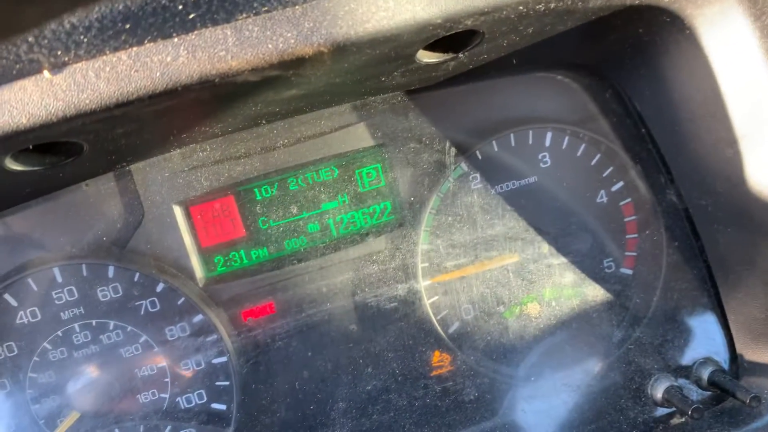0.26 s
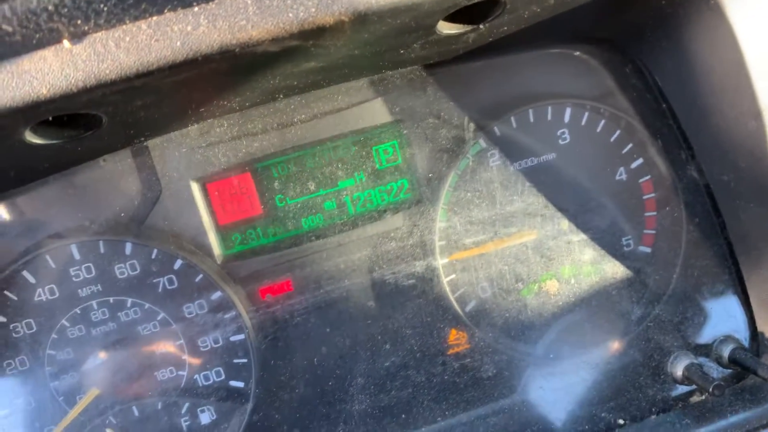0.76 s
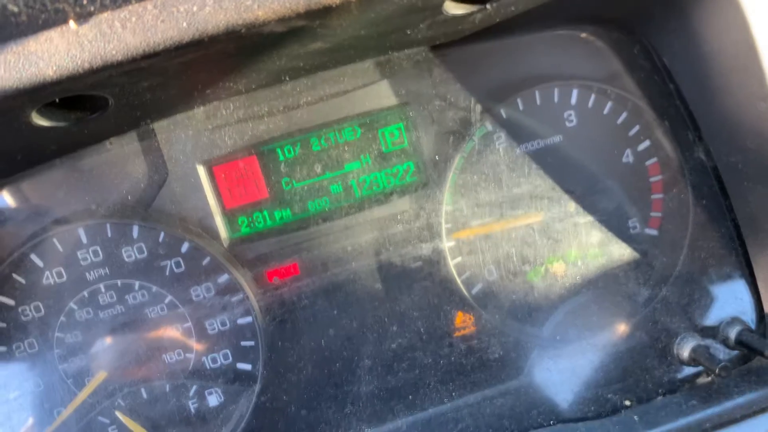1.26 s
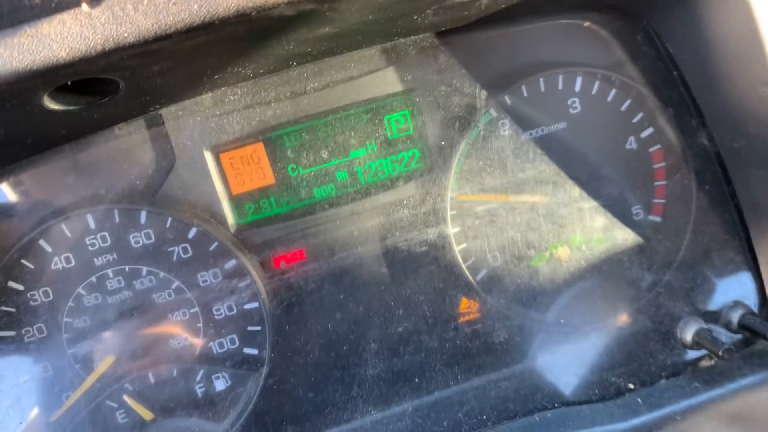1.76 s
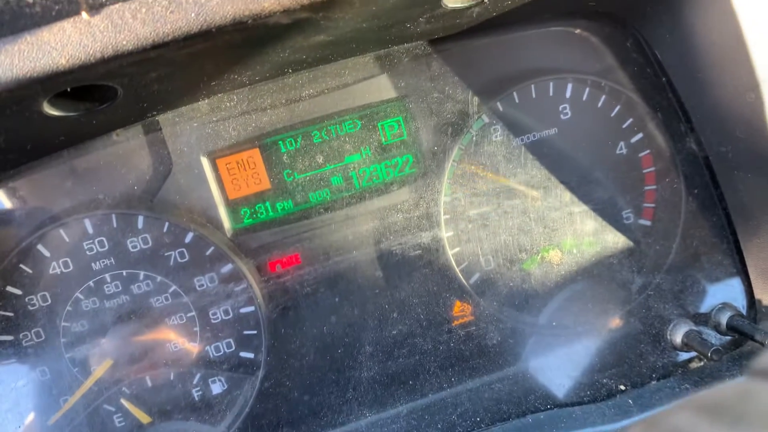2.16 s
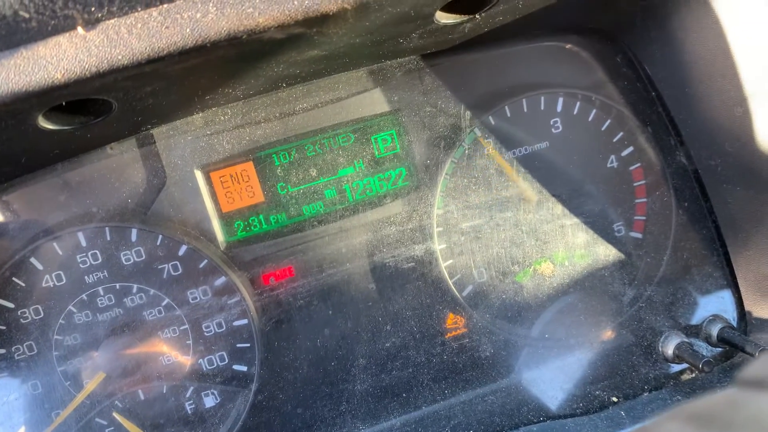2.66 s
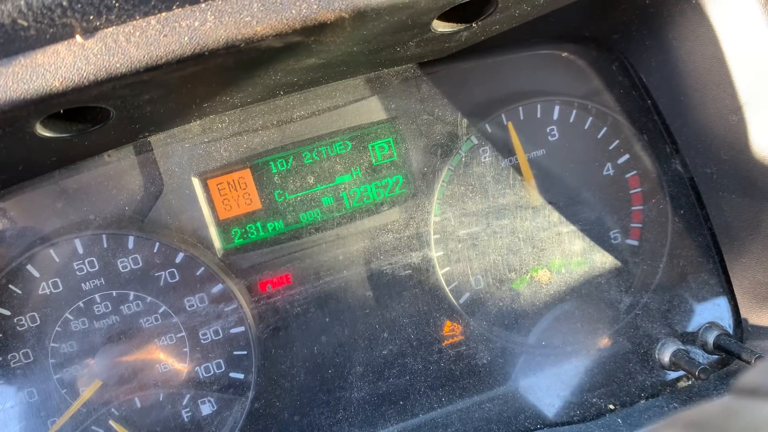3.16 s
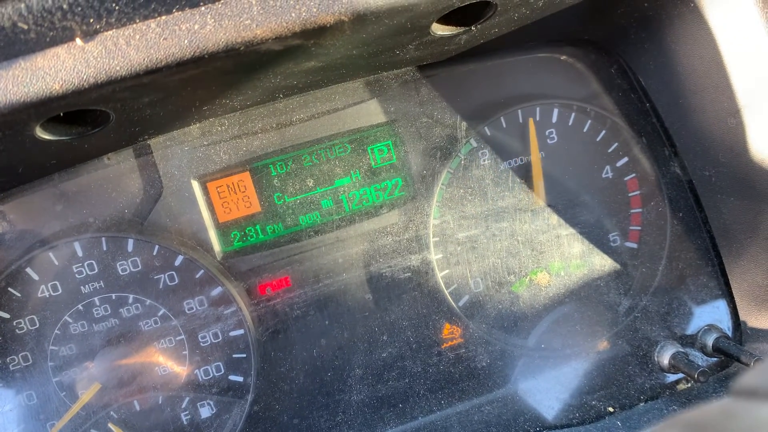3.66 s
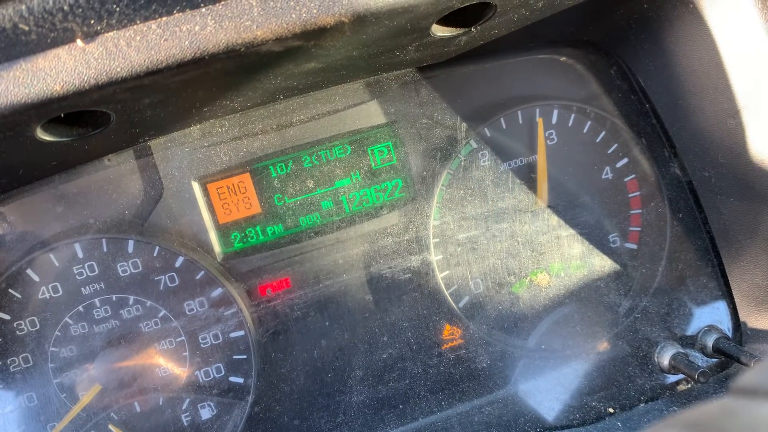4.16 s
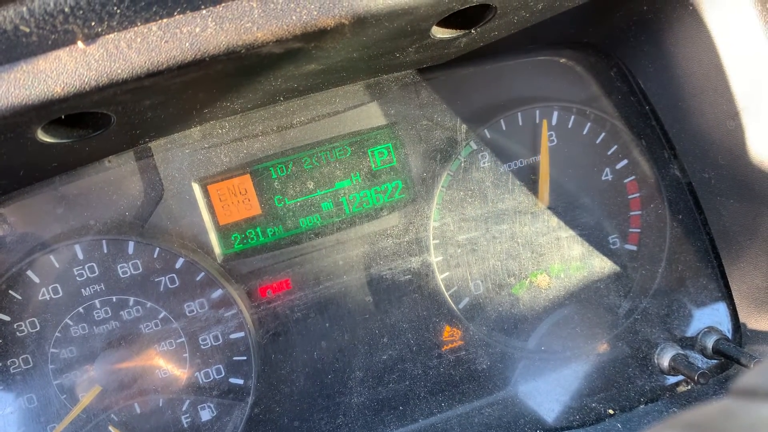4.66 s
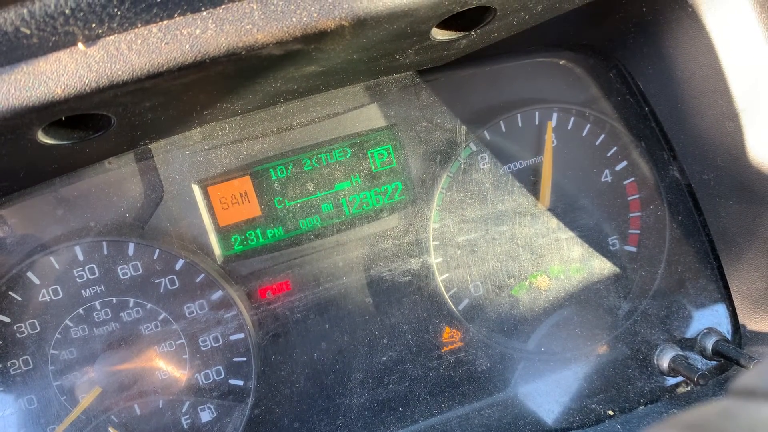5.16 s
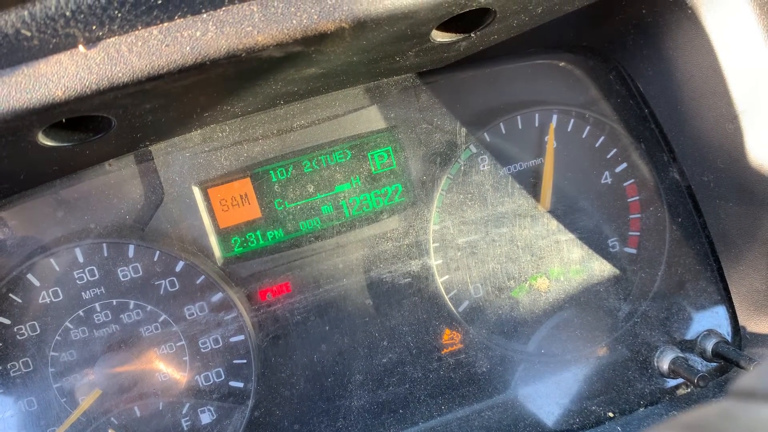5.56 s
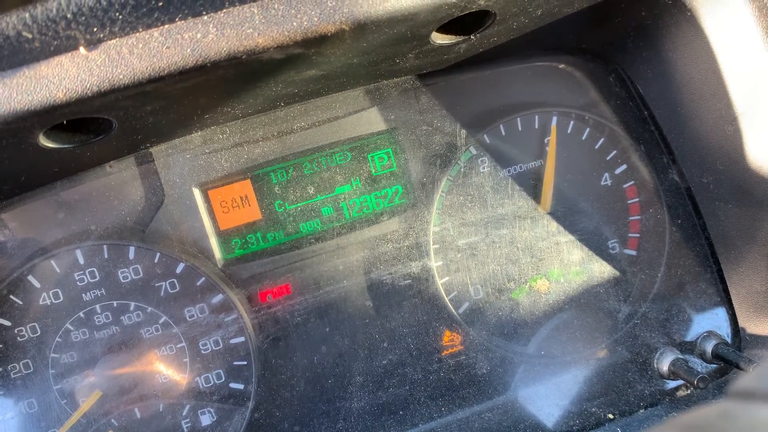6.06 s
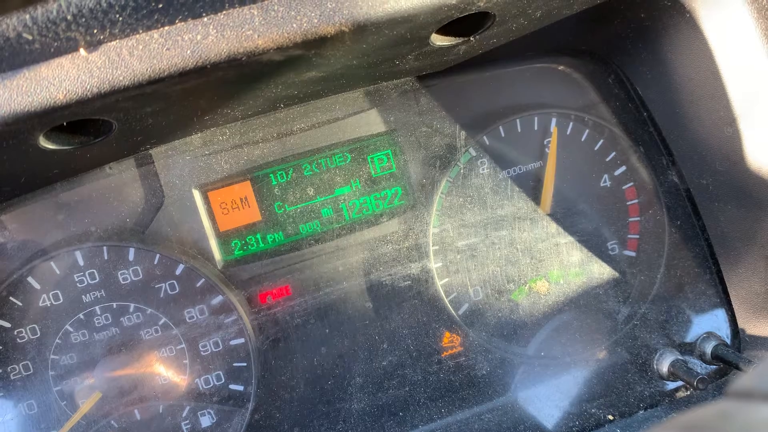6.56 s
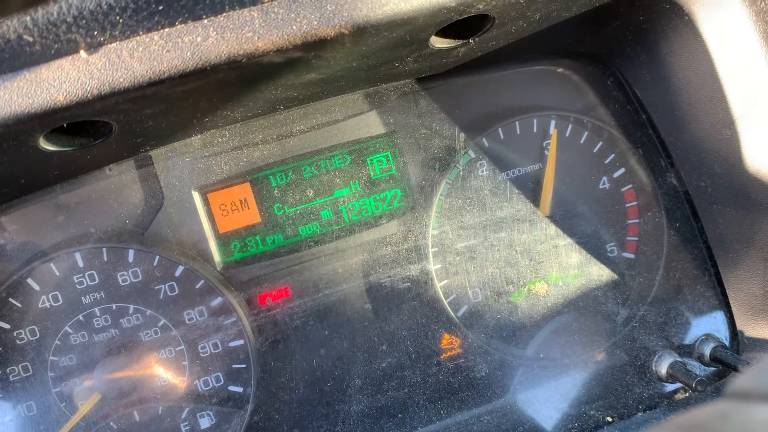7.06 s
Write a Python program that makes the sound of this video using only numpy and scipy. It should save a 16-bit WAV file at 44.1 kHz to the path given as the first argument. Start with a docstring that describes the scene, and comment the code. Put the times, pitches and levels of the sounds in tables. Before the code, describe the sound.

Heard from the dashboard inside a truck cab, a four-cylinder diesel idles for the first 0.8 seconds: a low thudding chug of about twenty-one firings a second, with muffled clatter and a faint thin electric whine. A dull plastic clack cluster opens the sound at 0 s and a smaller, brighter one follows near 0.37 s. From about 0.9 s the revs rise, with a soft grainy rustle at 1.1-1.5 s. Thuds blur into a growling boom, gear tones climb, and a fan whirs upward into a broad airy roar, strongest around 3.1-3.4 s. Engine speed nears its top by 3.4 s, dips slightly around 4 s, then settles at nearly one hundred firings a second. Until 7.3 s it holds a dense, loud, deep drone with metallic clatter, panel resonances and brief wavering hums; the growl eases after 5 s and the fan pitch slowly sinks.

```python
"""Diesel truck revved, heard from the cab

A four-cylinder diesel idles, is revved up and held near 3000 rpm. Sine harmonics of the firing boom in the cab;
struck noise paths, one blow a firing or denser, shake the panels, growl and clatter through the firewall.
The cooling fan, a set of sines over shaped noise, roars up with the engine, then slips back on its clutch.
Two small clacks at idle, soft rustles, hums and thin electric whines lie around them."""
import sys
import numpy as np
from scipy import signal
from scipy.fft import rfft, irfft, next_fast_len
from scipy.io import wavfile
from scipy.ndimage import uniform_filter1d

SR = 44100
rng = np.random.default_rng(int(sys.argv[2]) if len(sys.argv) > 2 else 0)


def transcribe(u):
    """Save the signal u as a 16-bit wav file named by the first command-line argument.

    u: samples, shape (n,) or (channels, n), limited to [-1, 1]; the rate is SR.
    q: integer samples, one column per channel.
    """
    v = np.clip(np.atleast_2d(u).T, -1, 1)
    q = np.round(v * 32767).astype(np.int16)
    wavfile.write(sys.argv[1], SR, q)


N = 321930
TIME = np.arange(N) / SR
IDLE_RATE, FULL_RATE = 21.5, 99.8  # firings per second

# Cooling fan. Each row: time in seconds, blade rate in Hz, blade tone level in dB.
FAN = [(1.5, 146.1, -47.5), (2.3, 246.2, -37.5), (3.1, 309.8, -33), (3.4, 318.2, -41.5), (4.2, 296, -31.5),
       (4.9, 269.3, -37.5), (5.2, 262.8, -30), (5.55, 254.7, -24), (5.8, 252.6, -27.5), (6.4, 246.8, -27),
       (7.3, 243.1, -34.5)]
# Stereo width. Each row: frequency in Hz, side against centre in dB,
# share of the side a quarter cycle ahead of the centre (-1..1).
WIDTH = [(60, -20, 0), (100, -15, 0.26), (170, -16, 0.075), (260, -16, 0.072), (400, -5.5, -0.43),
         (640, 6, -0.26), (825, 2.5, 0.16), (1050, 9, 0.31), (1310, 11.5, 0.85), (1800, -0.5, -.6),
         (2110, 0, .3), (2600, -2, 0.86), (4300, 0, .6)]


def amp(db):
    """Decibels to gain."""
    return 10 ** (np.asarray(db) / 20)


def lean(db):
    """Gains of the left and right ear: left up by db, right down by as much."""
    return amp([[db], [-db]])


def unit(x):
    """Scales to rms 1."""
    return x / np.sqrt(np.mean(x ** 2) + 1e-20)


def curves(rows):
    """The columns of a timed table, one value a sample."""
    s, *columns = np.transpose(rows)
    return [np.interp(TIME, s, c) for c in columns]


def at_hz(rows, hz):
    """The columns of a spectrum, read on a log-frequency axis."""
    f, *columns = np.transpose(rows)
    return [np.interp(np.log(hz + 1), np.log(f + 1), c) for c in columns]


def wander(rate):
    """Slow chance of rms 1, up to about rate changes a second."""
    knots = np.linspace(0, TIME[-1], 1024)
    f = np.fft.rfftfreq(len(knots), knots[1])
    slow = irfft(rfft(rng.standard_normal(len(knots))) * np.exp(-(f / rate) ** 2))
    return np.interp(TIME, knots, unit(slow))


def cycles(hz):
    """Turns made so far at a changing rate."""
    return np.cumsum(hz) / SR


def tone(turns, db, flutter_db, flutter_rate):
    """A sine whose level flutters by flutter_db rms."""
    level = np.sqrt(2) * amp(db + flutter_db * wander(flutter_rate))
    return level * np.sin(2 * np.pi * (turns + rng.random()))


def cab(pair, colour):
    """Colours two unrelated signals and spreads them as centre and side: bass nearly mono, mids wide."""
    # Narrow resonances of block and panels. Each row: frequency in Hz, width in Hz, lift in dB.
    panels = [(382, 92, 3.5), (818, 60, 6), (1020, 20, 6), (1252, 35, 8), (1380, 71, 8.5), (1400, 22, 0),
              (1560, 23, 5), (1740, 59, 2), (1830, 23, 4), (1902, 6.2, 6.5), (2010, 54, 3), (2230, 21, 3.5),
              (2420, 12, 5), (3270, 160, 1.5)]
    size = next_fast_len(N + SR // 4, True)
    hz = np.fft.rfftfreq(size, 1 / SR)
    lift_db = sum(db / (1 + (2 * (hz - f) / width) ** 2) for f, width, db in panels)
    low_skirt = np.clip(hz / colour[0][0], 0, 1) ** 4
    high_skirt = 1 / (1 + (hz / colour[-1][0] / 1.3) ** 8)
    centre, other = rfft(pair, size) * amp(at_hz(colour, hz)[0] + lift_db) * low_skirt * high_skirt
    side_db, lead = at_hz(WIDTH, hz)
    lead = np.clip(lead, -.95, .95)
    side = amp(side_db) * (1j * lead * centre + np.sqrt(1 - lead ** 2) * other)
    out = irfft(np.array([centre + side, centre - side]), size)[:, :N]
    return out / np.sqrt(np.mean(out.mean(0) ** 2))


def knocks(firings, rate, t60, uneven_db, rough, count, alike=0):
    """count blows per four firings excite decaying noise paths; rough is the power share of added noise."""
    blow = np.floor(firings * count / 4)
    at = np.flatnonzero(np.diff(blow)) + 1
    force = amp(uneven_db * rng.standard_normal(4096))[:len(at)] / np.sqrt(rate[at])
    t, out = np.arange(8192) / SR, np.zeros((2, N))
    shared = rng.standard_normal((2, len(t)))
    for k in range(count):
        train = np.zeros(N)
        train[at[k::count]] = force[k::count]
        own = rng.standard_normal((2, len(t)))
        path = rfft((np.sqrt(alike) * shared + np.sqrt(1 - alike) * own) * amp(-60 * t / t60))
        # half-flattened spectrum, 64 samples late
        path = np.roll(irfft(path / abs(path) ** .5), 64, axis=1)
        out += signal.oaconvolve(train[None], path, axes=1)[:, :N]
    # noise slightly stronger just after each firing
    puffs = rng.standard_normal((2, N)) * (1 + 0.078 * np.exp(-(firings % 1) / 0.79))
    rough = np.clip(rough, 0, 1)
    return np.sqrt(1 - rough) * unit(out) + np.sqrt(rough) * unit(puffs)


def revved(pair, rate, idle, fast):
    """The colour turns from idle to fast between 42 and 82 firings per second."""
    share = np.clip((rate - 42) / 40, 0, 1)
    return np.sqrt(1 - share) * cab(pair, idle) + np.sqrt(share) * cab(pair, fast)


def order(firings, rate, multiple, tuned_rate, reach, centre_db, side_db):
    """One engine order swells as the speed carries it across a resonance."""
    near_db = np.maximum(-3 * ((rate - tuned_rate) / reach) ** 2, -40)
    jitter = .04 * wander(6) + .035 * wander(30)
    turn = 2 * np.pi * (multiple * firings + rng.random() + jitter)
    size = np.sqrt(2) * amp(near_db + 1.2 * wander(3) + 1.4 * wander(20) - .3)
    lead = np.copysign(1, at_hz(WIDTH, multiple * tuned_rate)[1])
    centre, side = amp(centre_db) * np.sin(turn), lead * amp(side_db) * np.cos(turn)
    return size * np.array([centre + side, centre - side])


def rustles():
    """Soft grainy rustles, band-shaped noise that swells and fades as the revs begin."""
    # Each row: start in seconds, length in seconds, centre in Hz, level in dB.
    rustle_rows = [(1.11, 0.41, 3080, -54), (1.347, 0.2, 6270, -75)]
    out = np.zeros((2, N))
    for start, length, hz, db in rustle_rows:
        swell = np.sin(np.pi * np.clip((TIME - start) / length, 0, 1)) ** 2
        colour = [(0.49 * hz, -12), (hz, 0), (1.24 * hz, -8), (1.9 * hz, -28)]
        grain = cab(rng.standard_normal((2, N)), colour)
        out += amp(db + 1.2 * wander(50)) * np.sqrt(swell) * grain
    return out


def ring(age, modes):
    """Dying modes of a struck part, each reaching the two ears in its own phase."""
    out = 0
    for hz, db, t60 in modes:
        phase = rng.random() + .2 * rng.random((2, 1))
        out = out + amp(db - 60 * age / t60) * np.sin(2 * np.pi * (hz * age + phase))
    return out


def clacks():
    """Short plastic sounds: a burst of rattle, and the struck part rings on in the cab."""
    # Each row: start in seconds, level in dB, rise in seconds, t60 in seconds, brightness 0-1.
    clack_rows = [(0.004, -27, 0.0013, 0.11, 0.14), (0.01, -38, 0.0011, 0.08, 0),
                  (0.021, -32, .001, 0.38, 0.17), (0.365, -32.5, 0.0012, 0.043, 0.5),
                  (0.377, -38.5, .002, 0.087, 0.7), (0.388, -44.5, 0.0044, 0.27, 0.95)]
    # Rattle colours. Each row: frequency in Hz, density in dB per Hz.
    dull_colour, bright_colour = [(400, 10.5), (650, -3), (1450, -11), (1650, -1), (1950, -1), (2150, -8),
                                  (2350, 1), (2800, -13), (3300, -16), (4300, -15.5), (5100, -22),
                                  (5800, -23.5), (7000, -30), (8000, -46), (15000, -38)], [(1200, -28), (2000, -1), (2400, -5), (2900, -7.5),
                                                      (3120, -5), (3500, -12), (4400, -13), (5400, -34),
                                                      (5750, -26), (7000, -37), (8000, -46), (15000, -38)]
    # Ringing modes. Each row: frequency in Hz, relative level in dB, t60 in seconds.
    dull_modes, bright_modes = [(1690, -2, 0.14), (1776, -6, .12), (2030, -3.5, .13), (2350, 0, .08),
                                (2580, -19, 0.092), (3295, -15, 0.17), (4100, -8, 0.046), (4630, -15, .1)], [(2050, 4, 0.074), (3050, -2, .08), (3310, -7, .2),
                                                   (3780, -13, .18), (4330, -9.5, .17), (4743, -19, .13),
                                                   (5739, -24, .12), (6961, -31, .1)]
    ring_db = -3
    dull = cab(rng.standard_normal((2, N)), dull_colour)
    bright = cab(rng.standard_normal((2, N)), bright_colour)
    out = np.zeros((2, N))
    age = TIME[:SR // 2]
    for s, db, rise, t60, brightness in clack_rows:
        start, share = max(round(s * SR), 0), np.clip(brightness, 0, 1)
        span = slice(start, start + len(age))
        rattle = np.sqrt(1 - share) * dull[:, span] + np.sqrt(share) * bright[:, span]
        rattle = amp(-60 * age / t60) * rattle
        modes = (1 - share) * ring(age, dull_modes) + share * ring(age, bright_modes)
        out[:, span] += amp(db) * (1 - np.exp(-age / rise)) * (rattle + amp(ring_db) * modes)
    return out


def hum():
    """Wavering sine hums that swell, glide a little and fade."""
    # Each row: start in seconds, length in seconds, first Hz, last Hz, level in dB.
    hum_rows = [(3.194, 0.58, 395, 391, -37), (3.248, 0.49, 806, 820, -44.5),
                (4.119, 0.72, 234.7, 207.3, -32), (5.875, 0.26, 407, 408, -26),
                (6.044, 0.54, 405.6, 409.3, -34.5), (6.721, 0.38, 1554, 1555, -47)]
    rise_s, fall_s = 0.15, 0.082
    out = np.zeros(N)
    for start, length, from_hz, to_hz, db in hum_rows:
        age = TIME - start
        envelope = np.clip(age / rise_s, 0, 1) * np.clip((length - age) / fall_s, 0, 1)
        hz = np.interp(age, [0, length], [from_hz, to_hz])
        turns = cycles(hz) + .05 * wander(18)
        out += envelope * tone(turns, db, flutter_db=1.6, flutter_rate=18)
    return out * lean(1.5)


def whine(revs):
    """A cluster of thin electric whines of fixed pitch, 2 dB weaker at full revs."""
    # Each row: frequency in Hz, level at idle in dB.
    whine_rows = [(1663, -65), (1793, -57), (1921, -48), (2008, -61.5), (2301, -62.5), (2312, -62)]
    lines = np.zeros(N)
    for hz, db in whine_rows:
        lines += tone(hz * TIME + 0.05 * wander(5.7), db, flutter_db=1.3, flutter_rate=27)
    return lines * amp(-2 * revs) * lean(.5)


def fan(draught):
    """The blade tone, its blurred octave, and a comb of shaft orders that grows with the draught."""
    # Uneven blades sound shaft orders. Each row: multiple of the shaft rate, level at full draught in dB.
    shaft_orders = [(5, -42), (6, -47), (7, -45), (8, -41), (9, -44), (10, -41), (11, -42), (12, -42),
                    (16, -44), (17, -47), (18, -48), (19, -49), (20, -48), (21, -48), (23, -49), (24, -47)]
    blade_count = 13
    blade_hz, db = curves(FAN)
    turns = cycles(blade_hz)
    blades = tone(turns + .045 * wander(9), db - .7, flutter_db=1.2, flutter_rate=10)
    second = tone(2 * turns + 0.54 * wander(11), db - 10.5, flutter_db=1.5, flutter_rate=20)
    shaft = turns / blade_count
    comb = np.zeros(N)
    for multiple, order_db in shaft_orders:
        comb += tone(multiple * shaft + .05 * wander(8), order_db, flutter_db=2, flutter_rate=6)
    # the octave is in opposite phase at the two ears
    return (blades + draught * comb) * lean(.2) + second * np.array([[1], [-.3]])


def roar(firings, rate, revs, draught):
    """Air roar: nearly pure noise, shaped by the cab, that grows with revs and fan draught."""
    # Each row: frequency in Hz, density in dB per Hz.
    roar_colour = [(280, -16), (420, 0), (510, 5), (620, 3), (720, -6), (825, -6), (910, -6), (1040, -7.5),
                   (1200, -13.5), (1800, -32), (3000, -48)]
    idle_db, revs_db, fan_db = -48.5, 9, 8
    rush = knocks(firings, rate, t60=0.21, uneven_db=5.5, rough=0.99, count=4)
    return amp(idle_db + revs_db * revs + fan_db * draught) * cab(rush, roar_colour) * lean(.5)


def gears(firings, rate):
    """Tones of the timing gears and the block climb with the engine, each over its own range of speed."""
    # Each row: multiple of the firing rate, loudest at firings per second,
    # reach in firings per second, centre level in dB, side level in dB.
    gear_rows = [(2.75, 87, 4, -32, -56), (3, 97.7, 1, -43, -56), (3.25, 90, 3, -36, -56),
                 (4, 95, 2, -42, -52), (5, 85, 2.5, -37, -47), (5, 95, 2, -43, -45), (6, 87, 4, -44, -49),
                 (6.5, 93.5, 2.5, -48, -42), (7.5, 94, 4, -56, -49), (8, 80, 8, -55, -53),
                 (7, 98, 1, -51, -50), (7.25, 98, 1, -52, -50), (8.5, 97.7, 1.2, -39, -47),
                 (9.5, 87.5, 2.6, -41.5, -48), (9.5, 98, 1, -52, -46), (9.75, 90, 3, -53, -51),
                 (10, 82.5, 2, -47, -54), (10, 91, 1.6, -45, -50), (10, 94.5, 1, -55, -42),
                 (11, 94, 3, -51, -45), (11.5, 72.5, 3.5, -44, -53), (11.5, 97.4, .8, -58, -46),
                 (12, 82, 3, -50, -54), (11.5, 89, 4, -49, -52), (11.5, 93.5, 1.8, -52, -42),
                 (12, 93, 4, -55, -47), (12.5, 65, 4, -46, -55), (12.5, 87.5, 3, -51, -43),
                 (12.75, 98, .9, -51, -50), (13.5, 94, 3, -59, -44), (18.5, 98.5, .6, -49, -56),
                 (18.75, 97.3, .7, -49, -55)]
    return sum(order(firings, rate, *row) for row in gear_rows)


def ringing(firings, rate):
    """Single orders stand out as the speed settles on the resonances of block and panels."""
    # Each row: multiple of the firing rate, centre level in dB, side level in dB.
    held_orders = [(1.75, -42, -61), (2.25, -38, -53), (2.75, -43, -56), (3.25, -43, -46), (3.75, -44, -61),
                   (4.25, -47, -65), (4.5, -47, -42), (5.0, -52, -51), (5.5, -49, -47), (6.25, -51, -53),
                   (6.75, -55, -47), (7.0, -55, -46), (7.25, -57, -47), (7.5, -57, -52), (7.75, -51, -46),
                   (8.0, -49, -47), (8.5, -47, -50), (9.0, -57, -49), (9.5, -63, -49), (10.0, -49, -51),
                   (10.5, -51, -42), (10.75, -55, -40), (11.0, -60, -46), (11.25, -61, -49),
                   (11.5, -64, -51), (12.0, -62, -49), (12.75, -58, -44), (13.0, -66, -43),
                   (13.25, -65, -52), (13.5, -66, -53), (13.75, -61, -47), (14.0, -54, -58),
                   (14.25, -56, -50), (14.5, -62, -49), (15.0, -61, -48), (15.75, -52, -52),
                   (16.25, -66, -47), (17.0, -47.5, -61), (17.25, -53, -53), (18.0, -53, -61),
                   (18.25, -44.5, -51), (18.5, -57, -64), (19.25, -49, -62), (19.75, -54, -62),
                   (20.0, -55, -54), (20.25, -49.5, -53), (22.0, -53, -59), (22.25, -52.5, -62)]
    out = np.zeros((2, N))
    for multiple, centre_db, side_db in held_orders:
        out += order(firings, rate, multiple, 99.5, 1.6, centre_db, side_db)
    return out


def strokes(firings):
    """The clatter surges twice a firing, and no two cylinders hit equally hard."""
    # One clatter level a cylinder, in dB.
    cylinders = [1, -.7, .3, -.6]
    surge_db = .8
    cylinder_db = np.array(cylinders)[firings.astype(int) % len(cylinders)]
    return unit(amp(cylinder_db + surge_db * np.cos(4 * np.pi * firings)))


def flicker(pair):
    """Narrow bands swell and sink at random, in patches of the spectrogram."""
    patch_db, patch_hz, patch_s = 2.7, 110, .05
    size, hop = 2048, 512
    z = signal.stft(pair, nperseg=size, noverlap=size - hop)[2]
    field = rng.standard_normal((z.shape[2], z.shape[1])).T
    field = uniform_filter1d(field, round(patch_hz * size / SR), axis=0)
    field = uniform_filter1d(field, round(patch_s * SR / hop), axis=1)
    gain = unit(amp(patch_db * unit(field)))
    return signal.istft(z * gain, nperseg=size, noverlap=size - hop)[1][:, :N]


def clatter(firings, rate, revs):
    """Injectors and valves tick three times a firing: clatter through the firewall, and a treble fizz."""
    # Colours at idle, at speed and of the fizz. Each row: frequency in Hz, density in dB per Hz.
    idle_colour, fast_colour = [(450, -8), (700, -10), (830, -5.5), (1050, -7), (1200, -15), (1500, -12),
                                (1700, -5.5), (1920, -2), (2150, -10), (2350, -9.5), (2650, -17),
                                (3400, -18.5), (4500, -29), (5500, -47.5), (7000, -48.5)], [(600, -31.5), (820, -4.5), (1030, -8.5), (1180, -17),
                                                      (1500, -5), (1830, -0.5), (2100, -2), (2350, -5),
                                                      (2650, -8.5), (2950, -8.5), (3270, -8), (3800, -17.5),
                                                      (5000, -30.5), (6000, -34.5), (7500, -65.5)]
    fizz_colour = [(7000, -10), (9000, -30), (11000, -1), (13000, -10), (14600, 4.5), (15600, -10.5)]
    idle_db, revs_db, fizz_db = -47, 9.5, -32.5  # fizz is relative to the clatter
    rough = .45 + .05 * revs
    ticks = knocks(firings, rate, t60=.07, uneven_db=1.3, rough=rough, count=12)
    level_db = idle_db + revs_db * revs
    rattle = flicker(revved(ticks, rate, idle_colour, fast_colour))
    rattle = amp(level_db) * strokes(firings) * rattle
    fizz = amp(level_db + fizz_db) * np.sqrt(rate / FULL_RATE) * cab(ticks, fizz_colour)
    return rattle * lean(.5) + fizz


def growl(firings, rate):
    """Hard combustion while the engine gathers speed: one sharp blow a firing."""
    # Each row: time in seconds, growl level in dB.
    pull = [(0, -78), (1.2, -43.5), (2.1, -41), (3.15, -33.5), (3.7, -37), (4.5, -35.5), (5.1, -51.5),
            (5.6, -45.5), (7.3, -52)]
    # Each row: frequency in Hz, density in dB per Hz.
    growl_colour = [(110, 1), (180, -2), (300, -1.5), (450, -9.5), (600, -5), (720, -21.5), (840, -6),
                    (950, -12.5), (1080, -10.5), (1250, -31.5), (2000, -8), (3000, -31.5)]
    blows = knocks(firings, rate, t60=.05, uneven_db=.7, rough=.03, count=4)
    return amp(curves(pull)[0]) * cab(blows, growl_colour) * lean(.5)


def shake(firings, rate, revs, draught):
    """Firing thuds shake the panels; the fan's draught adds to the level."""
    # Colours at idle and at speed. Each row: frequency in Hz, density in dB per Hz.
    idle_colour, fast_colour = [(25, -30), (45, 1), (75, 6.5), (112, 1.5), (140, -9), (172, 1.5),
                                (195, -14.5), (222, -6), (268, -1.5), (305, -19.5), (350, -19), (390, -8.5),
                                (440, -29.5), (600, -53)], [(22, -22.5), (42, 3), (60, -3.5), (90, 5), (120, 1),
                                                    (150, -2), (225, 0), (285, -5.5), (345, -14.5),
                                                    (390, -9), (450, -25.5), (600, -36.5)]
    idle_db, fan_db = -28.5, 3
    rough = .2 + .3 * revs
    thuds = knocks(firings, rate, t60=0.066, uneven_db=1.2, rough=rough, count=4, alike=.15)
    return amp(idle_db + fan_db * draught) * revved(thuds, rate, idle_colour, fast_colour)


def boom(firings, rate):
    """The lowest firing harmonics pump the cab air and swell as each crosses one of its resonances."""
    # Each row: multiple of the firing rate, level added to the cab response in dB.
    harmonics = [(1, 0.5), (2, -10), (3, -19.5)]
    # Air of the cab, resonant near 45 and 92 Hz. Each row: frequency in Hz, response in dB.
    cab_response = [(21, -43), (30, -34.5), (33, -26), (37, -15.5), (51, -13.5), (57, -21), (63, -49.5),
                    (68, -22), (76, -24), (81, -17.5), (92.5, -12), (96.5, -12.5), (100, -15.5),
                    (110, -22.5), (170, -21.5), (182, -33), (300, -30.5)]
    # Even chug at idle. Each row: multiple of the firing rate, level at idle in dB.
    chug = [(3, -41), (4, -34.5), (5, -41), (5.25, -37), (7, -46), (8, -44), (10, -44), (11, -45),
            (12, -48), (12.5, -45), (17.75, -46), (20, -57)]
    out = np.zeros(N)
    for multiple, db in harmonics:
        multiple = round(multiple)
        cab_db = at_hz(cab_response, multiple * rate)[0]
        flutter_db = 0.17 * multiple ** 2
        out += tone(multiple * firings, db + cab_db, flutter_db, flutter_rate=40)
    fade_db = -20 * np.clip((rate - 23) / 9, 0, 2)  # chug sinks by 40 dB as the revs rise
    for multiple, db in chug:
        out += tone(multiple * firings, db + fade_db, flutter_db=1.0, flutter_rate=7.5)
    return out * lean(-.35)


def scene():
    """One crankshaft drives boom, shake, growl, gears and clatter; the fan's draught adds roar."""
    # Engine speed. Each row: time in seconds, firings per second.
    speed = [(0.0, 21.3), (0.78, 22.1), (1.05, 26.9), (1.3, 32.3), (1.65, 50.2), (1.9, 55), (2.08, 69.3),
             (2.25, 75), (2.55, 83.7), (2.8, 89.0), (3.05, 92.0), (3.4, 96.0), (3.68, 95.8), (3.97, 93.4),
             (4.55, 97.2), (5.45, 98.9), (6.4, 99.6), (7.3, 99.8)]
    rate = curves(speed)[0] * (1 + .0006 * wander(6))
    firings = cycles(rate)
    # the powers bring most of the noise late in the climb
    revs = np.clip((rate - IDLE_RATE) / (FULL_RATE - IDLE_RATE), 0, 1) ** 1.9
    blade_hz = curves(FAN)[0]
    draught = ((blade_hz - blade_hz.min()) / np.ptp(blade_hz)) ** 1.74
    small_sounds = rustles() + clacks() + hum() + whine(revs)
    air = fan(draught) + roar(firings, rate, revs, draught)
    orders = gears(firings, rate) + ringing(firings, rate)
    blows = clatter(firings, rate, revs) + growl(firings, rate) + shake(firings, rate, revs, draught)
    return small_sounds + air + orders + blows + boom(firings, rate)


def record(dry):
    """A steep linear-phase low-pass ends the treble."""
    edge_hz = 15700
    low_pass = signal.firwin(511, edge_hz, window=("kaiser", 9), fs=SR)
    return signal.oaconvolve(dry, low_pass[None], "same")


dry = scene()
out = record(dry)
transcribe(out)
```